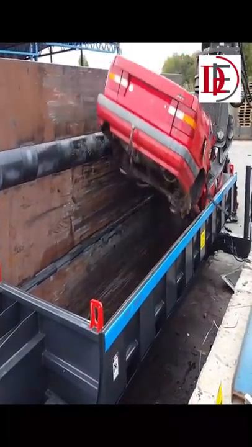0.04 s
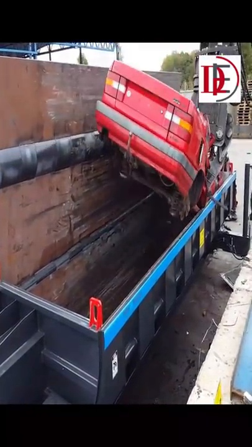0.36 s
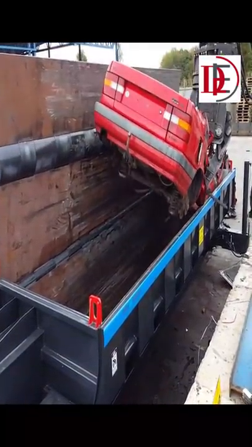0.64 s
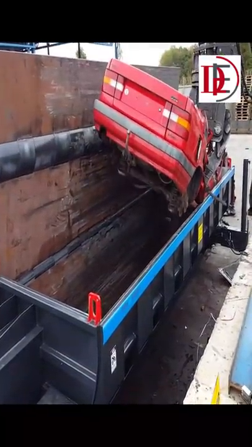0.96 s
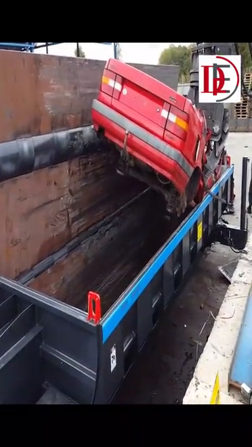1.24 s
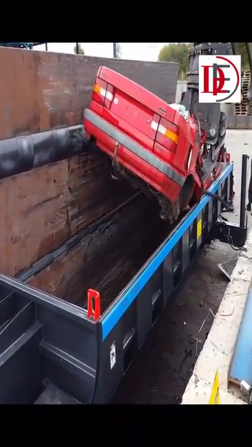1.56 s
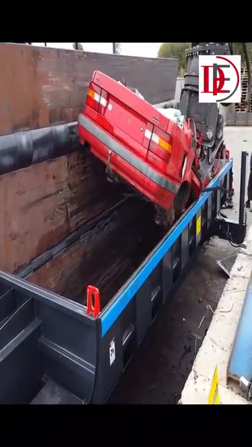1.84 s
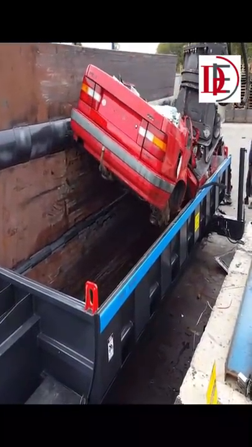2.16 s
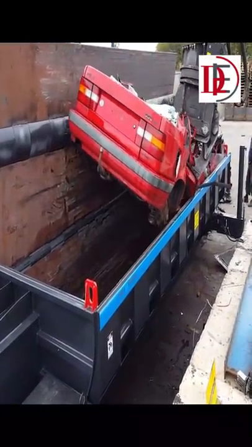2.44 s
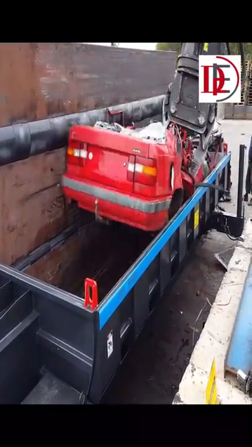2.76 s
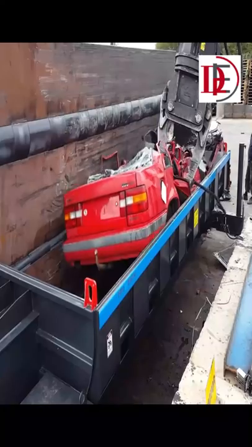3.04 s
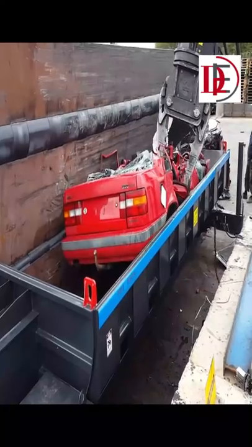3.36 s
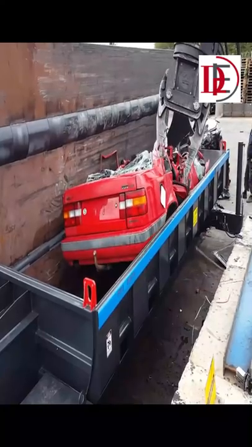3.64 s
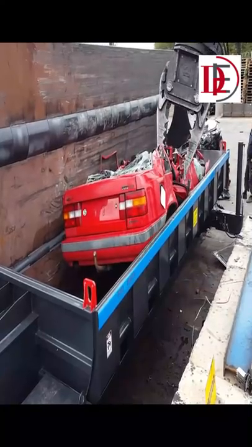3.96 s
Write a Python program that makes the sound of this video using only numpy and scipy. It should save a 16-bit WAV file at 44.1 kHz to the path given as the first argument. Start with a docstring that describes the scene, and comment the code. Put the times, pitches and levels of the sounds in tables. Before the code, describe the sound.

Car body metal crunching and booming into a steel bin over a throbbing diesel engine.

```python
"""Sheet metal crunches over a throbbing diesel: in a scrap yard, a crane is lowering a wrecked car
into the steel bin of a baler. From a stereo pair near the bin, the body is heard knocking and creaking
against the walls, shedding glass and grit, and landing with hollow booms about three seconds in.
Behind it the engine puffs and clatters under a hydraulic pump's whine; then the machinery grows quieter."""
import sys
import numpy as np
from scipy import signal
from scipy.fft import rfft, irfft
from scipy.io import wavfile
from scipy.ndimage import uniform_filter1d

SR = 44100
rng = np.random.default_rng(int(sys.argv[2]) if len(sys.argv) > 2 else 0)


def master(y):
    """Save y as 16-bit WAV."""
    cut = np.clip(np.atleast_2d(y).T, -1, 1)
    pcm = np.round(cut * 32767)  # scale
    wavfile.write(sys.argv[1], SR, pcm.astype(np.int16))


N = 176400
T = np.arange(N) / SR
SIDES = np.array([[1], [-1]])   # left, right

# the car body gives way: t/s, length/s, panel level/dB, fold level/dB, crack level/dB
CRUNCHES = [(0, .08, -26, -22, -35), (0.094, .11, -27, -23.5, -33.5), (0.202, 0.039, -23.5, -17.5, -32),
            (0.279, .09, -31.5, -25.5, -36.5), (0.448, .05, -25, -27, -39),
            (0.555, .015, -39, -20.5, -33.5), (0.781, 0.015, -40, -26, -39), (0.986, .008, -30, -26, -48),
            (1.47, .04, -24.5, -25, -28), (1.597, .015, -28, -21.5, -28.5), (1.611, .022, -34, -36, -29),
            (1.649, .12, -32, -33, -38), (1.799, .015, -26, -22, -33), (2.738, .08, -22.5, -21.5, -40),
            (2.849, .055, -27.5, -22.5, -31), (2.89, .045, -20, -23, -37), (2.939, 0.031, -28, -20, -39),
            (2.972, .05, -46, -31, -39), (3.032, .03, -34, -21, -38), (3.062, .095, -19, -20, -36.5),
            (3.165, .015, -25, -25.5, -37), (3.186, 0.016, -21.5, -19, -54), (3.212, .055, -18, -21, -41),
            (3.296, .05, -23, -33.5, -49), (3.472, .06, -35, -31.5, -43),
            (3.531, 0.062, -31.5, -25.5, -41.5), (3.599, .05, -31, -30, -47)]
# spectra of bending panels, crumpling folds and sharp cracks: f/Hz, level/dB
PANEL_SPECTRUM = [(60, -34), (130, 5.5), (400, 2.5), (600, 2.5), (1000, 2.5), (1400, -7), (3000, -38)]
FOLD_SPECTRUM = [(500, -16), (1100, -7), (1550, 2), (2100, 2), (2600, -9), (3200, -12.5), (7000, -37)]
CRACK_SPECTRUM = [(1500, -40), (3000, -6), (5500, 2), (8000, -5), (11000, -16), (15500, -51)]
# heavy blows on the bin: t/s, level/dB
BOOMS = [(2.742, -30), (3.062, -24.5), (3.187, -14.5), (3.222, -15), (3.258, -18)]
# modes of the bin: f/Hz, level/dB, t60/s
BIN_MODES = [(317.5, 7, 0.11), (536, -1.5, 0.27), (645, 3.5, 0.14), (693, -4.5, 0.68), (820, -7, .3),
             (974, -2.5, 0.35), (1116, -12, 0.29), (1255, -4.5, 0.33)]
# the car knocks on the walls: t/s, level/dB, f/Hz favoured by the struck spot
KNOCKS = [(.208, -15, 2020), (.784, -18, 1400), (.985, -26, 1400), (1.479, -19.5, 1300),
          (1.609, -23.5, 1830), (1.8, -22, 1810), (2.882, -17.5, 1260)]
# modes of its sheet metal: f/Hz, level/dB
SHEET_MODES = [(1090, -2), (1195, -5), (1415, -1), (1740, -5), (1960, -5.5), (2350, 0), (2620, 0),
               (3400, -2)]
# bent metal creaks: t/s, length/s, f/Hz, width/Hz, level/dB
CREAKS = [(0.204, 0.024, 2640, 600, -21), (.533, .025, 703, 70, -18.5), (1.604, 0.042, 790, 150, -22),
          (1.605, 0.042, 2070, 200, -21.5), (2.74, 0.022, 650, 130, -21.5), (2.744, 0.039, 910, 150, -24),
          (2.937, .016, 2530, 520, -19), (3.062, 0.035, 1640, 170, -21)]
# the car drags along a wall: t/s, length/s, level/dB
DRAGS = [(2.8, 0.097, -28), (3.04, 0.081, -19)]
# that wall's rumble: f/Hz, level/dB
RUMBLE_SPECTRUM = [(50, -33), (90, -15), (125, 4), (170, -13), (260, -6), (1000, -60)]
# a loose steel part is struck: t/s, level/dB
CLINKS = [(.552, -18)]
# its modes: f/Hz, level/dB, t60/s
CLINK_MODES = [(1975, -2, .14), (2020, -1, .25), (2125, -3, .3), (4170, -8, .1)]
# glass and grit fall: t/s, length/s, level/dB
TRICKLES = [(0, .03, -28.5), (.13, .11, -33.5), (0.291, .07, -31.5), (.555, .04, -35), (0.811, .015, -34),
            (1.609, 0.02, -28.5), (1.722, .055, -30.5), (1.796, .012, -26), (1.945, .08, -33),
            (2.098, .05, -36.5), (2.852, 0.05, -45), (3.031, .13, -41), (3.165, 0.076, -47),
            (3.872, .03, -45.5)]
# the tick of their grains: f/Hz, level/dB
GRIT_SPECTRUM = [(2500, -2), (5000, 5), (8000, 4.5), (11000, -1), (15500, -2.5)]

# the machinery behind the car: t/s, exhaust level/dB, clatter level/dB, drone level/dB
MACHINE_LEVELS = [(0, -17, -20.5, -27.5), (.2, -15.5, -17.5, -34), (.4, -18.5, -20, -36),
                  (.7, -19, -21.5, -30.5), (1.05, -16, -20, -32), (1.45, -14, -17, -26),
                  (1.8, -14.5, -18, -30), (2.1, -13, -17.5, -26), (2.7, -12, -17.5, -25),
                  (2.95, -16.5, -18, -33), (3.1, -20, -17.5, -33), (3.21, -19.5, -23, -51),
                  (3.42, -25, -25, -37.5), (3.62, -25, -28, -45), (3.75, -25, -31.5, -36),
                  (3.87, -25.5, -31, -39), (4, -21, -25, -33.5)]
# exhaust pipe resonances: f/Hz, width/Hz, level/dB
EXHAUST_MODES = [(156, 94, -17.5), (208.2, 25.6, -5.5), (268.8, 25, -1), (312, 24.3, 0),
                 (372.8, 40.4, -5.5)]
# engine orders humming in the pipe: multiple of the revolution, level/dB re exhaust level
HUM_ORDERS = [(14, -11.5), (15, -11.5)]
# the engine block's clatter: f/Hz, level/dB
CLATTER_SPECTRUM = [(25, -24), (50, -8), (100, 1), (200, 5), (420, 1.5), (900, -0.5), (1350, -5),
                    (2000, -5.5), (2550, -9), (3100, -17), (4800, -18.5), (8000, -24.5), (11000, -30.5),
                    (15500, -36.5)]
# pump and gear tones: f/Hz, level/dB re exhaust level
WHINES = [(435.3, -12.5), (656, -22.5), (931, -23.5), (1093, -21.5), (1385, -20.5), (1968, -25)]
# deep machine tones: f/Hz, level/dB re drone level
DRONES = [(50.4, -2.5), (72.9, -3)]

# how alike the two microphones hear the yard: f/Hz, correlation/0-1
MIC_LIKENESS = [(60, 0.99), (110, 0.97), (350, 1), (550, 0.94), (900, 0.76), (1400, 0.95), (2000, 0),
                (4500, 0), (15000, 0)]
# their balance, leaning mostly right: f/Hz, left minus right level/dB
MIC_BALANCE = [(350, -1), (700, -2), (1200, -8), (2300, 1), (4500, -2.5), (8000, 0)]

REV_HZ, FIRINGS_PER_REV, PUFF_DECAY_S = 18.22, 4, 0.024
SNAPS_PER_S, SNAP_SPREAD_DB, FIRST_SNAP_DB, RUN_FADE_DB = 260, 4.5, 7.5, 1.5
SHEET_T60_S, SPOT_FOCUS_DB, BUCKLE_BLUR_HZ = .22, 12, 11
CREAK_RISE_S, CREAK_T60_S, SLIP_RATE_HZ, SLIP_SPREAD_DB = .003, .15, 140, 3
DIRECT_DB, DIRECT_T60_S, DIRECT_TOP_HZ = 5, .009, 3000
EARLY_T60_S, TAIL_T60_S, TAIL_DB = 0.061, 0.3, -1
EXHAUST_BAND_HZ, GAS_DB, EXHAUST_SIDE_DB, CLATTER_THROB = (85, 516), -.5, -20, 0.33
RIGHT_LAG_S, CUTOFF_HZ = .00015, 15400


def crunches():
    """The car's sheet metal gives way in runs of snaps: low panels, crumpling folds, bright cracks."""
    s, length, *levels = np.transpose(CRUNCHES)
    spectra = (PANEL_SPECTRUM, FOLD_SPECTRUM, CRACK_SPECTRUM)
    return sum(snap_runs(zip(s, length, db), spectrum) for db, spectrum in zip(levels, spectra))


def booms():
    """The car lands and sets the hollow bin ringing."""
    return struck(BOOMS, BIN_MODES, spread_db=1, attack_s=.0013)


def knocks():
    """A knock rings the sheet metal, most of all the modes near the pitch of the struck spot."""
    out = 0
    for s, knock_db, spot_hz in KNOCKS:
        modes = [(hz, db - SPOT_FOCUS_DB * np.log2(hz / spot_hz) ** 2, SHEET_T60_S)
                 for hz, db in SHEET_MODES]
        out = out + struck([(s, knock_db)], modes, spread_db=1.5, attack_s=.0005)
    return out


def creaks():
    """Uneven stick and slip drives one panel resonance, which then rings out; the wide ones screech."""
    out, t = np.zeros((2, N + SR)), T[:SR // 3]
    for s, length, hz, width_hz, db in CREAKS:
        band = [(hz / 2, -40), (hz - width_hz, -12), (hz, 0), (hz + width_hz, -12), (hz * 2, -40)]
        ring = at_mics(rng.standard_normal((2, len(t))), band)
        ring /= np.sqrt(uniform_filter1d(np.mean(ring ** 2, axis=0), size=1000) + 1e-20)   # hold level
        slips_db = SLIP_SPREAD_DB * drift(SLIP_RATE_HZ)[:len(t)] * (t < length)
        release_db = -60 * np.maximum(t - length, 0) / CREAK_T60_S
        envelope = (1 - np.exp(-t / CREAK_RISE_S)) * amp(db + slips_db + release_db)
        start = int(s * SR)
        out[:, start:start + len(t)] += envelope * ring
    return out[:, :N]


def wall_rumble():
    """The dragging car judders along a wall, which rumbles."""
    return snap_runs(DRAGS, RUMBLE_SPECTRUM)


def clink():
    """A loose steel part is struck and rings high."""
    return struck(CLINKS, CLINK_MODES, spread_db=.5, attack_s=.001)


def grit():
    """Glass and grit trickle into the bin, each grain a bright tick."""
    return snap_runs(TRICKLES, GRIT_SPECTRUM)


def engine(exhaust_db, clatter_db):
    """Each firing of the diesel puffs into the exhaust resonances and shakes the clattering block."""
    firing_hz = REV_HZ * FIRINGS_PER_REV
    since_firing_s = T % (1 / firing_hz)
    puffs = rms_one(np.exp(-since_firing_s / PUFF_DECAY_S))
    gas = puffs * turning_noise(share=.3)
    pipe = sum((-1) ** k * amp(db) * resonate(gas, hz, width)
               for k, (hz, width, db) in enumerate(EXHAUST_MODES))
    mid, side = signal.sosfilt(signal.butter(2, EXHAUST_BAND_HZ, "band", fs=SR, output="sos"), pipe)
    steady_mid = mid / np.sqrt(uniform_filter1d(mid ** 2, size=2600) + 1e-20)
    exhaust = steady_mid + amp(EXHAUST_SIDE_DB) * rms_one(side) * SIDES
    clatter = at_mics(turning_noise(share=.24) * (1 + CLATTER_THROB * puffs), CLATTER_SPECTRUM)
    hum = tones([(order * REV_HZ, db) for order, db in HUM_ORDERS], waver_db=2, wander_hz=2)
    return amp(exhaust_db) * (amp(GAS_DB) * exhaust + hum) + amp(clatter_db) * clatter


def pump_whine(exhaust_db):
    """The hydraulic pump and gears whine, swelling and fading with the exhaust."""
    return amp(exhaust_db) * tones(WHINES, waver_db=2, wander_hz=1.13)


def drone(drone_db):
    """Two deep machine tones lie under everything else."""
    return amp(drone_db) * tones(DRONES, waver_db=1.5, wander_hz=.51)


def snap_runs(runs, spectrum):
    """Each run is one firm snap and a fading train of uneven ones, echoing in the bin."""
    out = np.zeros((2, N + SR))
    for s, length, db in runs:
        count = max(2, int(length * SNAPS_PER_S))
        jitter = np.append(0, rng.random(count - 1))
        along = (np.arange(count) + jitter) / count
        scatter_db = SNAP_SPREAD_DB * np.clip(rng.standard_normal(count - 1), -2, 2)
        sizes_db = np.append(FIRST_SNAP_DB, scatter_db) - RUN_FADE_DB * along
        snaps = rng.choice([-1, 1], count) * amp(sizes_db)
        clicks = np.bincount((along * length * SR).astype(int), snaps)
        sound = in_bin(clicks, spectrum)
        start, span = int(s * SR), sound.shape[1]
        active_share = (length + EARLY_T60_S) * SR / span   # level is the mean over run and early echo
        out[:, start:start + span] += amp(db) * rms_one(sound) * np.sqrt(active_share)
    return out[:, :N]


def struck(blows, modes, spread_db, attack_s):
    """Each blow rings all modes, with new strengths on either side; pitches wander as the metal buckles."""
    out = np.zeros((2, N))
    for s, blow_db in blows:
        start = int(s * SR)
        t = T[:min(SR, N - start)]
        for hz, db, t60 in modes:
            phase = 2 * np.pi * rng.random() + rng.standard_normal((2, 1)) * (1 - at_hz(MIC_LIKENESS, hz))
            buckle = np.cumsum(rng.standard_normal(len(t))) * np.sqrt(2 * np.pi * BUCKLE_BLUR_HZ / SR)
            side_db = spread_db * rng.standard_normal((2, 1)) + SIDES * at_hz(MIC_BALANCE, hz) / 2
            envelope = amp(blow_db + db + side_db - 60 * t / t60) * (1 - np.exp(-t / attack_s))
            out[:, start:start + len(t)] += envelope * np.sin(2 * np.pi * hz * t + phase + buckle)
    return out


def tones(lines, waver_db, wander_hz):
    """Machine tones waver a little; the higher ones reach the two microphones out of step."""
    out = 0
    for hz, db in lines:
        phase = 2 * np.pi * (np.cumsum(hz + wander_hz * drift(3.7)) / SR + rng.random())
        apart = SIDES * np.arccos(at_hz(MIC_LIKENESS, hz)) / 2
        out = out + np.sqrt(2) * amp(db + waver_db * drift(4)) * np.sin(phase + apart)
    return out


def turning_noise(share):
    """Two noises, with a share of their power repeating on each engine revolution."""
    loop = rng.standard_normal((2, round(SR / REV_HZ)))
    repeating = loop[:, np.arange(N) % loop.shape[1]]
    return np.sqrt(share) * repeating + np.sqrt(1 - share) * rng.standard_normal((2, N))


def in_bin(clicks, spectrum):
    """A click arrives as a dull crack, then echoes between steel walls; every spot rings differently."""
    t = T[:SR // 3]
    spot = at_mics(rng.standard_normal((2, len(t))), spectrum)
    dull = signal.sosfiltfilt(signal.butter(2, DIRECT_TOP_HZ, fs=SR, output="sos"), spot)
    direct = dull * amp(DIRECT_DB - 60 * t / DIRECT_T60_S)
    echo = spot * (amp(-60 * t / EARLY_T60_S) + amp(TAIL_DB - 60 * t / TAIL_T60_S))
    return signal.fftconvolve(clicks[None], direct + echo)


def at_mics(pair, spectrum):
    """Two unrelated noises become left and right, with a spectrum and the yard's width and balance."""
    size = pair.shape[1]
    hz = np.fft.rfftfreq(size, 1 / SR)
    mid, side = rfft(pair) * amp(at_hz(spectrum, hz))
    alike = np.clip(at_hz(MIC_LIKENESS, hz), -.99, .99)
    both = np.sqrt(1 + alike) * mid + SIDES * np.sqrt(1 - alike) * side
    return rms_one(irfft(both * amp(SIDES * at_hz(MIC_BALANCE, hz) / 2), size))


def resonate(x, hz, width_hz):
    """One resonance with unit gain at its peak."""
    r = np.exp(-np.pi * width_hz / SR)
    poles = [1, -2 * r * np.cos(2 * np.pi * hz / SR), r * r]
    return signal.lfilter(np.array([1, 0, -1]) * (1 - r * r) / 2, poles, x)


def drift(rate_hz):
    """Random wander of unit RMS, mostly slower than rate_hz."""
    hz = np.fft.rfftfreq(N, 1 / SR)
    return rms_one(irfft(rfft(rng.standard_normal(N)) / (1 + (hz / rate_hz) ** 2), N))


def at_hz(points, hz):
    """A table's value along a log-frequency axis."""
    f, value = np.transpose(points)
    return np.interp(np.log(hz + 1), np.log(f), value)


def amp(db):
    return 10 ** (np.asarray(db) / 20)


def rms_one(x):
    return x / np.sqrt(np.mean(x ** 2) + 1e-20)


def scene():
    """The car in the bin with the machinery behind it; the sound reaches the left microphone first."""
    s, *levels = np.transpose(MACHINE_LEVELS)
    exhaust_db, clatter_db, drone_db = (np.interp(T, s, db) for db in levels)
    car = crunches() + booms() + knocks() + creaks() + wall_rumble() + clink() + grit()
    machinery = engine(exhaust_db, clatter_db) + pump_whine(exhaust_db) + drone(drone_db)
    left, right = car + machinery
    late_right = np.interp(np.arange(N) - round(RIGHT_LAG_S * SR), np.arange(N), right)
    return np.array([left, late_right])


def record(dry):
    """The recorder rounds the peaks and cuts the highest treble."""
    rounded = dry / (1 + dry ** 8) ** (1 / 8)
    return signal.sosfilt(signal.ellip(10, .2, 80, CUTOFF_HZ, fs=SR, output="sos"), rounded)


dry = scene()
out = record(dry)
master(out)
```